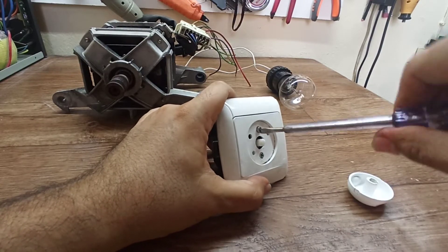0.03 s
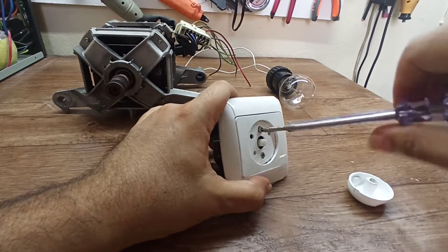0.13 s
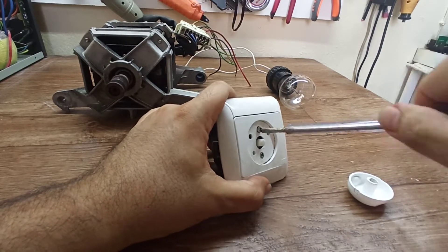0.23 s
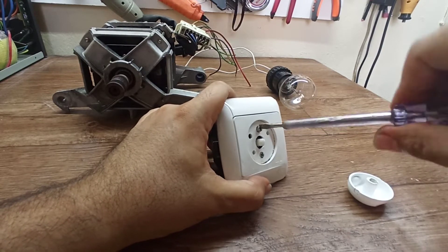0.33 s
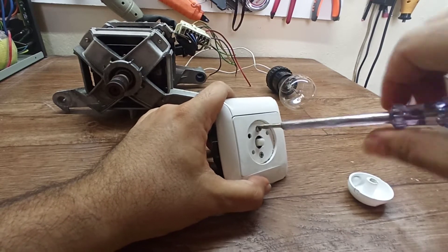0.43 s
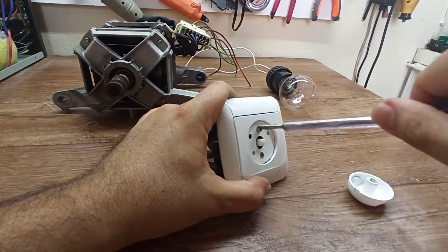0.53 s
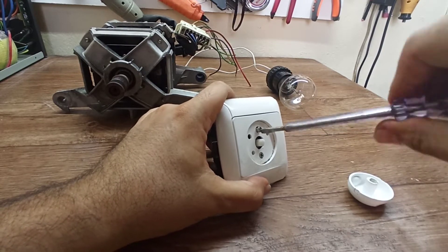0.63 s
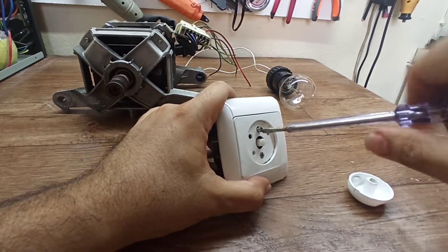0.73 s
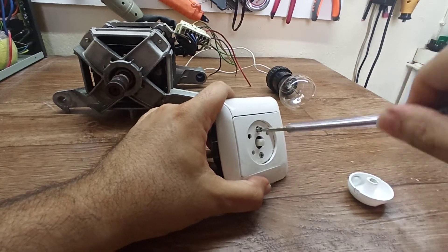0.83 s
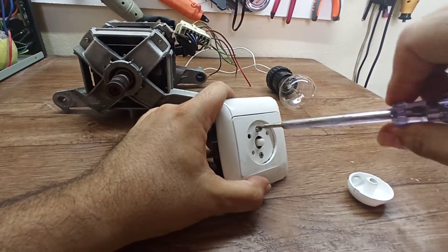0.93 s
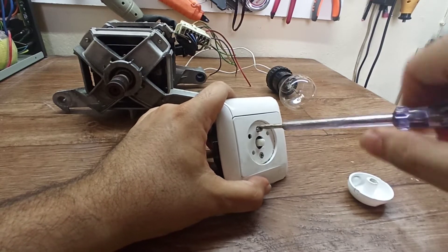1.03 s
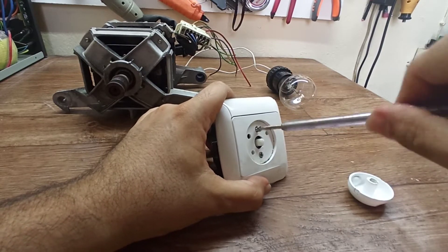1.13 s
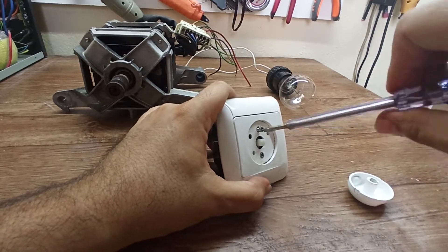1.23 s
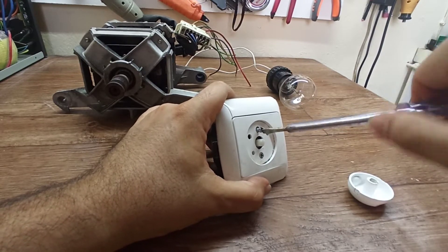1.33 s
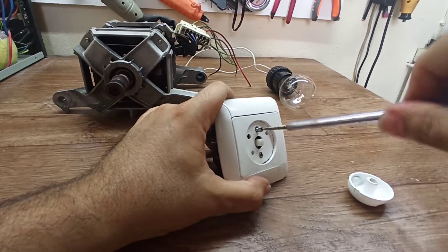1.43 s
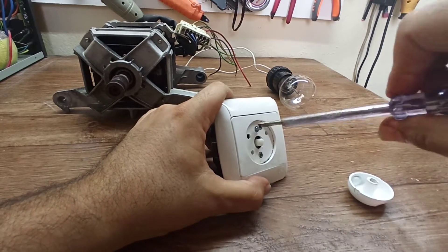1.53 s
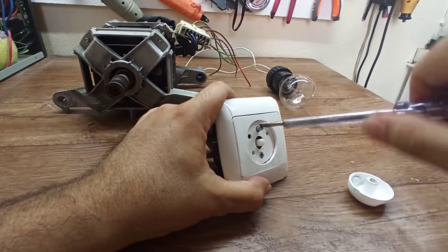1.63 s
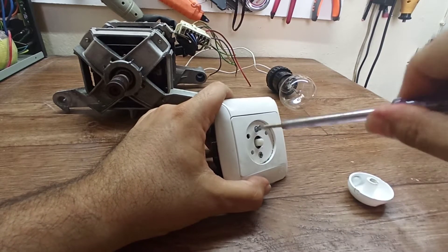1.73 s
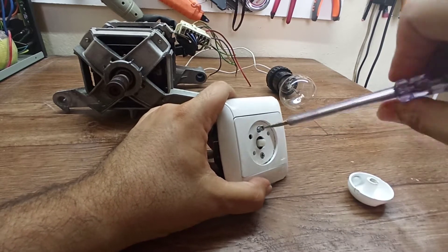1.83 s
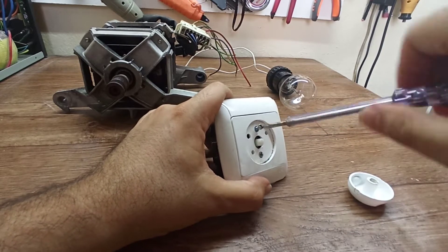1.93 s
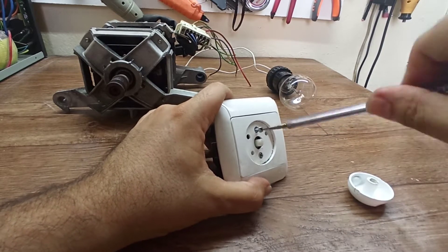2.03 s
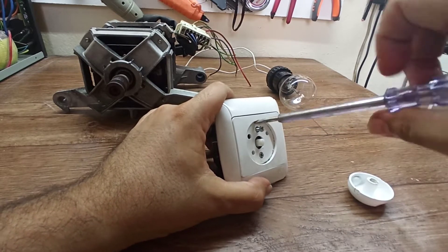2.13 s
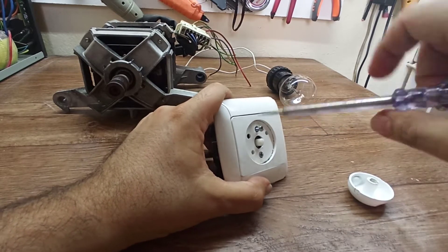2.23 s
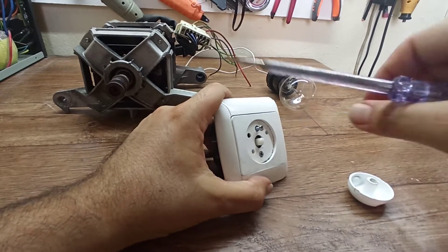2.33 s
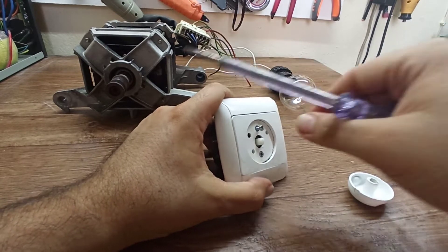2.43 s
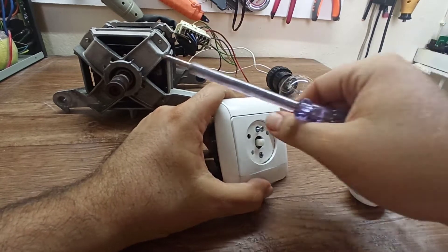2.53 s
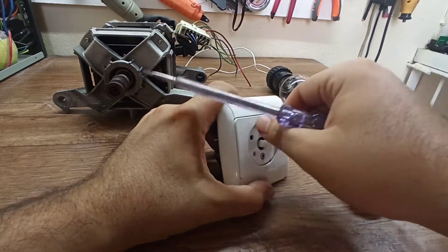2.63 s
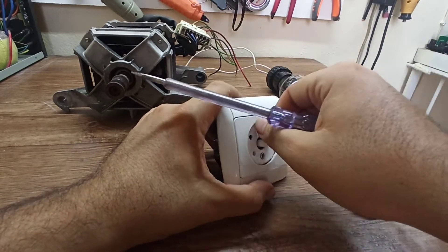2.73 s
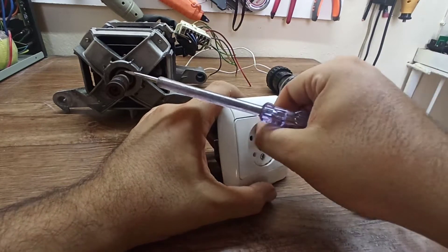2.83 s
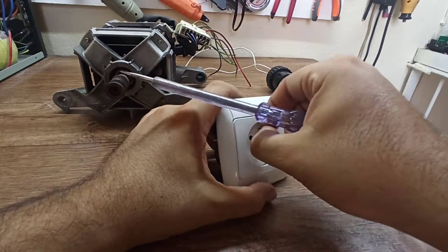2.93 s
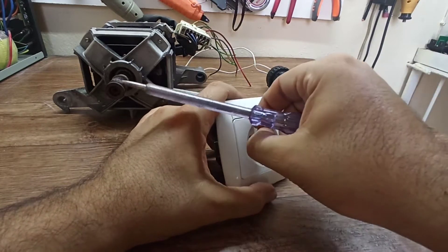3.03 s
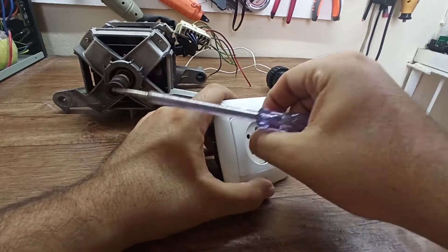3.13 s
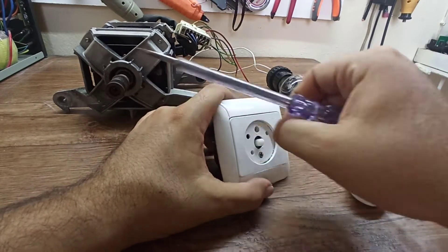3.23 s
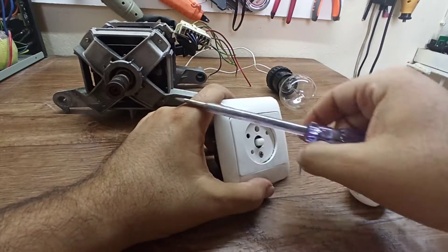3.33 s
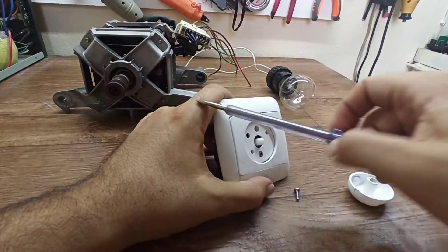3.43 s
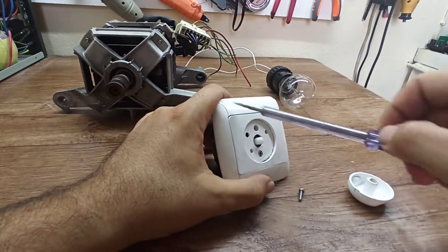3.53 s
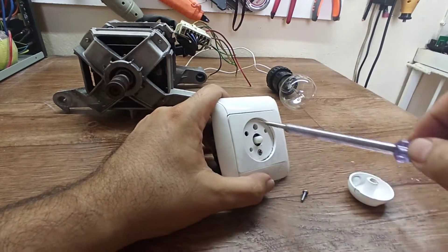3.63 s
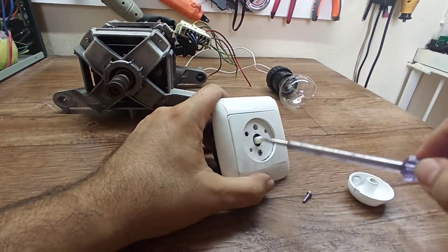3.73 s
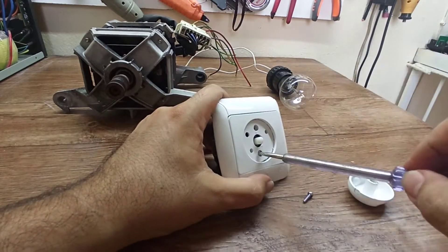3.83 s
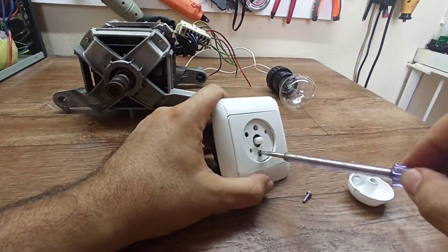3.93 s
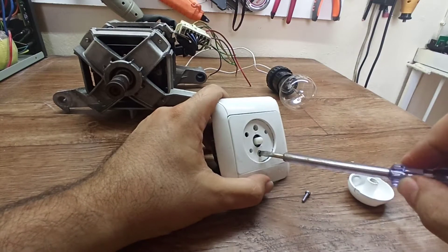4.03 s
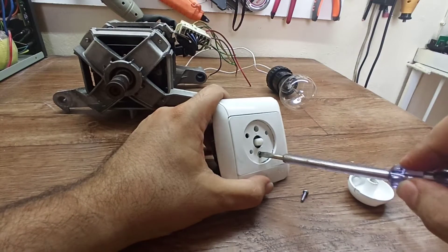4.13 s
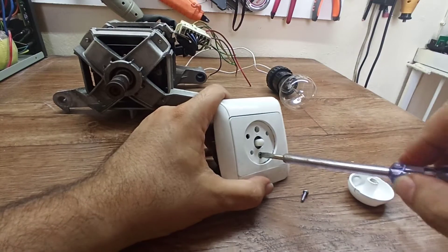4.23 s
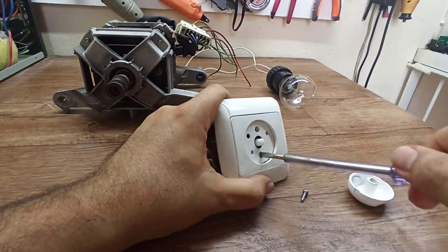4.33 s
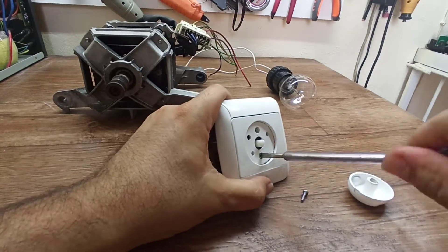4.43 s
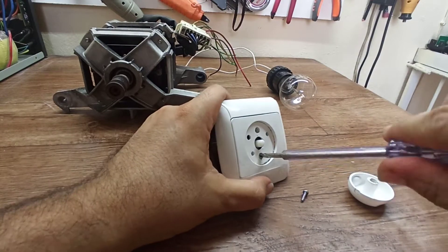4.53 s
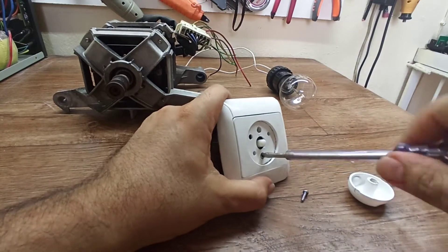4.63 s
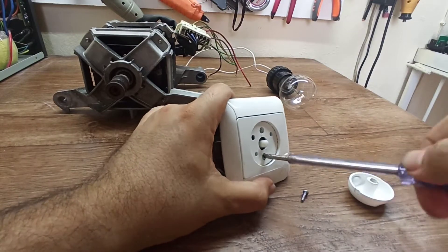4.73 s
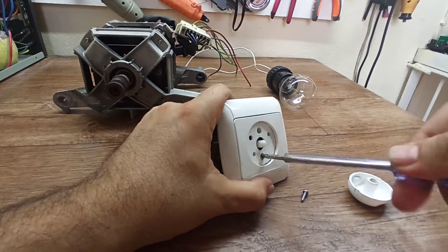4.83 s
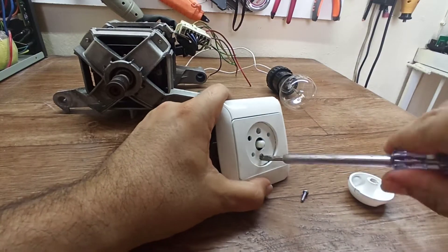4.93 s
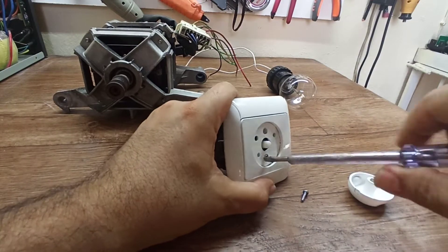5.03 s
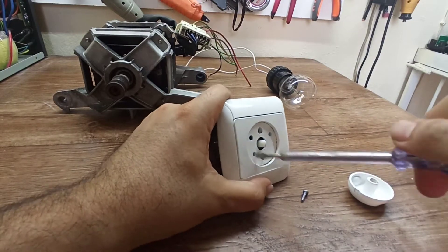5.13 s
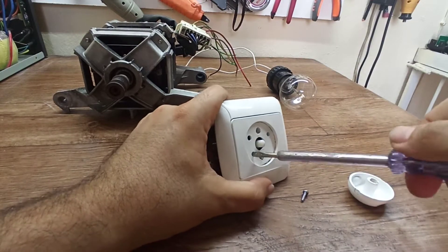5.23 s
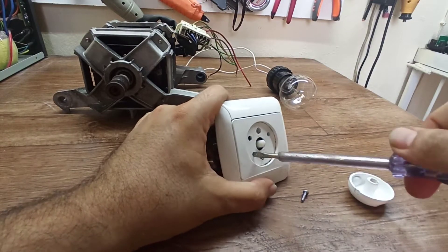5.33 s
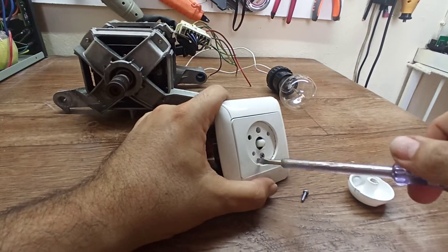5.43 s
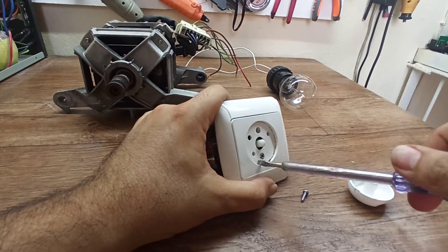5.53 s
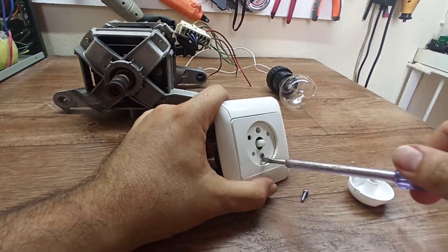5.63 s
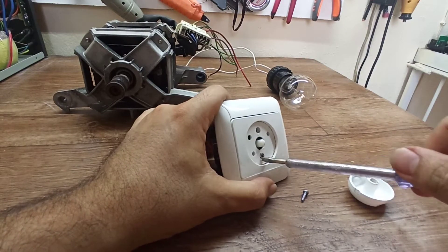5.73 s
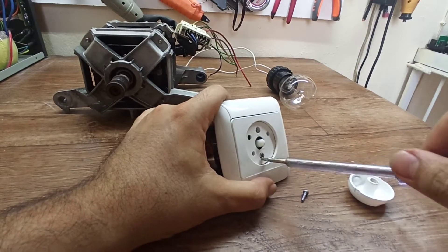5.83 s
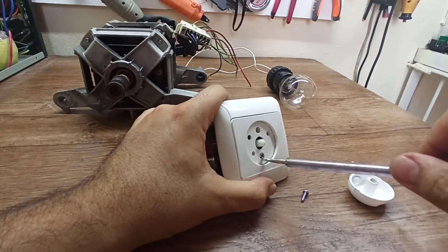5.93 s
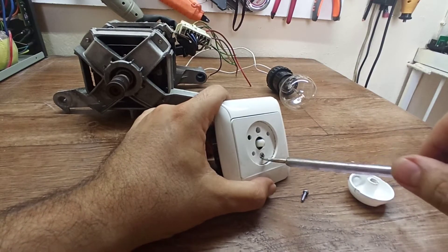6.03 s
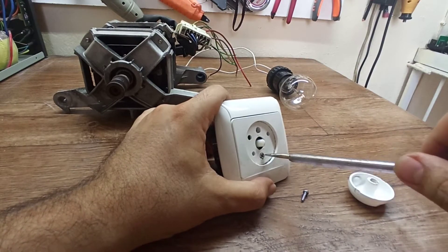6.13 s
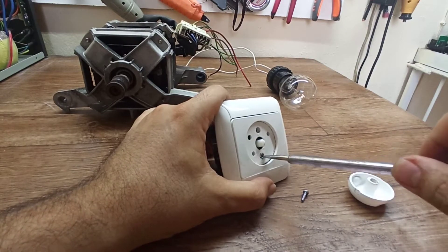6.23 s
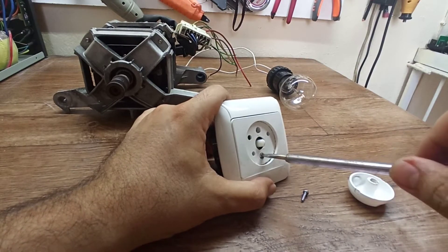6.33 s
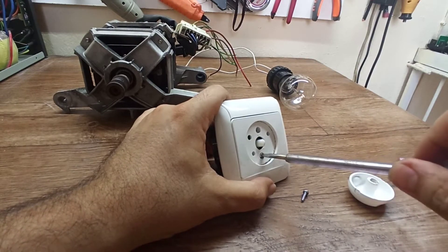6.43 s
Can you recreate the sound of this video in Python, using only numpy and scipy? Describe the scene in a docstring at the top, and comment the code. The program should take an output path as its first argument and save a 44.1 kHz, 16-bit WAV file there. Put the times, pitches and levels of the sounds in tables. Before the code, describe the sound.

In a small room, a screwdriver works on a plastic wall socket held on a wooden bench, close to the microphone. From 0 to 1.8 s there are barely audible ticks and rubs in the screw slot, with soft, dull hand thumps felt through the wood. At about 2.06 s the blade slips with a sharp, bright clack, a tiny scrape and a short hollow plastic rattle. Light clicks come near 2.95 s, then the strongest muffled bump at 3.1 s. At 3.38 s a small screw drops with a quick double knock and faint skips. A click at 3.56 s leads to low bumps at 3.6-3.8 s and small ticks around 4-4.6 s. Two crisp, hard clicks snap close together at 4.96-4.99 s with a brief scrape. Faint ticks and soft thumps continue until about 6.3 s over low rumble and thin steady hiss.

```python
"""A screwdriver works the screws of a plastic wall socket that one hand holds on a wooden workbench.
The blade ticks and slips (noise bursts plus a ringing housing) and scrapes (clouds of tiny slips).
Pushes of the hands reach the microphone through the bench as dull thumps: low-passed pulses and noise.
A loose screw drops on the bench as short decaying knocks. A small room answers blade and screw;
soft rumble and hiss lie underneath."""
import sys
import numpy as np
from scipy import signal
from scipy.fft import rfft, irfft, next_fast_len
from scipy.io import wavfile
from scipy.ndimage import map_coordinates

SR = 44100
rng = np.random.default_rng(int(sys.argv[2]) if len(sys.argv) > 2 else 0)


def master_out(mix):
    """Clip the mix to full scale and print it as 16-bit PCM to the path in sys.argv[1]."""
    frames = np.transpose(np.atleast_2d(mix))
    ceiling = np.clip(frames, -1, 1)
    pcm = np.round(ceiling * 32767).astype(np.int16)
    wavfile.write(sys.argv[1], SR, pcm)


N = 286209

# The blade slips on screw and housing:
# (time [s], relative level [dB], relative body [dB], relative sparkle [dB], strongest pitch [Hz])
BLADE_SLIPS = [(.184, -34, -2, -30, 8300), (.267, -41.5, -4, -12, 7600), (.5, -45, 3.5, -37, 1050),
               (.701, -39.5, -1, -33.5, 980), (.828, -39, -14, -24, 7500), (1.418, -39, -2, -18.5, 7700),
               (1.588, -46.5, -8, -11, 7500), (1.972, -32.5, -7, -30.5, 5200),
               (2.051, -35.5, 10, -18.5, 1710), (2.058, -15, -6.5, -20, 1380), (2.062, -8, -9, -16.5, 6400),
               (2.093, -17.5, -5, -27.5, 6600), (2.652, -40, -0.5, -36, 4400),
               (2.932, -30.5, -3, -28.5, 4200), (2.95, -20.5, -17.5, -20, 7900),
               (2.996, -30.5, -3, -22, 4500), (3.5596, -17.5, -3, -30, 3900), (3.5707, -30, -23, -32, 940),
               (3.673, -40.5, -5, -16, 7400), (3.85, -27.5, 1, -18, 7640), (4.037, -32, -0.5, -26, 1070),
               (4.39, -36, -12, -18.5, 3640), (4.598, -29, 0.5, -26, 1090), (4.933, -22, -8, -16.5, 3180),
               (4.9605, -10, -1, -19.5, 7100), (4.9875, -10, -7, -24, 1700),
               (5.145, -30.5, -5.5, -32, 2420), (5.263, -39, 0.5, -19.5, 4030),
               (5.405, -43, -1.5, -23.5, 2800), (5.5034, -28.5, -7.5, -50, 3040),
               (5.644, -36, -3.5, -33, 6000), (6.04, -28, -5, -16, 4250), (6.191, -38.5, 1, -42, 1700),
               (6.231, -34, 2, -23, 3850), (6.307, -39, 2.5, -30, 2380)]
# The screw lands and skips on the wood: (time [s], relative level [dB])
SCREW_LANDINGS = [(3.3816, -15.5), (3.388, -16.5), (3.4072, -33), (3.4156, -34)]
# The blade drags over metal and plastic: (middle [s], half length [s], level [dB])
BLADE_DRAGS = [(1.978, 0.0081, -49.5), (2.074, 0.019, -38.5), (2.67, 0.033, -55), (2.947, 0.023, -45),
               (4.595, 0.0072, -48.5), (4.969, 0.018, -40), (6.251, 0.011, -56)]
# Housing and blade ring together: (pitch [Hz], relative strength [dB], time to fall by 60 dB [s])
HOUSING_RINGS = [(723, 0.5, .08), (858, 4.5, 0.08), (1106, 10.5, 0.035), (1277, 8.5, 0.044),
                 (1540, 4, 0.028), (1784, -1, 0.033), (1910, -13, 0.062), (2180, -5.5, 0.13),
                 (2800, 7, 0.051), (3020, -2, .06), (3200, -2, 0.078), (3810, -16, 0.031),
                 (4200, -21.5, .04), (4610, 8, 0.059), (5480, 8, 0.074), (6810, 6.5, 0.043),
                 (6430, 3.5, 0.11), (6820, -2, 0.064), (7480, -2, 0.075), (8060, -21, .07)]
# Tone colour of the blade's contact: (frequency [Hz], gain [dB])
CONTACT_COLOUR = [(100, -21), (400, -11.5), (700, -6), (1000, -8), (1600, -6.5), (2400, -3), (4400, 0),
                  (5100, -11), (6600, -1.5), (8300, -3), (12000, 0.5), (16000, -7)]
# Tone colour of the room rumble: (frequency [Hz], relative density [dB per Hz])
RUMBLE_COLOUR = [(20, -31), (40, -20.5), (62, -13.5), (85, 6), (105, 7), (180, -9.5), (300, -1),
                 (420, -7.5), (570, -15.5), (760, -15.5), (890, -9), (1500, -22.5), (3000, -24.5),
                 (4500, -25), (5200, -36.5), (6500, -26.5), (8300, -35), (11000, -53)]
# Tone colour of the microphone hiss: (frequency [Hz], relative density [dB per Hz])
HISS_COLOUR = [(4000, -44.5), (7000, -12), (8300, 1), (12000, -0.5), (15500, -6.5)]
# How long the room rings on: (frequency [Hz], time to fall by 60 dB [s])
ROOM_DECAY = [(100, 0.26), (400, 0.39), (1200, 0.34), (3000, 0.66), (7000, 0.58), (9000, 0.47),
              (15000, 0.42)]
# How the microphone colours the sound: (frequency [Hz], gain [dB])
MICROPHONE_COLOUR = [(20, 2.5), (8450, -1.5), (8850, -15), (10200, -19), (11300, -20.5), (11700, -2.5),
                     (16000, 5)]
# While the screw turns, the blade ticks and rubs faintly in its slot: (start [s], end [s])
TURNING_SPELLS = [(0, 1.8), (4.75, 4.93)]
# The hands push the housing against the bench:
# (main jolt [s], relative level [dB], build-up [s], run-out [s], approximate upper edge [Hz])
HAND_PUSHES = [(.355, -30, 0.033, 0.026, 250), (.621, -27.5, 0.036, 0.053, 312), (.858, -34, 0, 0, 235),
               (1.039, -38, 0, 0, 178), (1.102, -33.5, 0, 0, 322), (1.324, -36, 0, 0, 216),
               (1.46, -31.5, 0, 0.069, 280), (1.614, -35.5, 0.042, 0.087, 233),
               (1.808, -29.5, 0, 0.043, 210), (1.886, -28.5, 0, 0.048, 256), (2.07, -33.5, 0, 0.036, 318),
               (2.245, -37, 0, 0.001, 242), (2.443, -40.5, 0.043, 0, 210), (2.912, -35, 0.0065, 0.042, 243),
               (3.084, -21, 0.064, 0.042, 345), (3.351, -37.5, 0, 0, 182), (3.533, -34, 0.028, 0, 333),
               (3.636, -25, .02, 0.0024, 288), (3.757, -23.5, 0, 0.023, 294),
               (3.971, -37.5, 0, 0.0002, 163), (4.127, -28, .029, .028, 387),
               (4.389, -24.5, .017, 0, 257.3), (4.425, -29, 0.0044, 0.056, 330),
               (4.866, -32.5, 0.054, .032, 270), (4.936, -28.5, 0, .064, 381),
               (5.138, -29, .018, 0.0013, 421.6), (5.159, -29.5, 0, 0.086, 274), (5.342, -34, 0, 0, 228),
               (5.424, -27.5, 0, .027, 300), (5.619, -32.5, 0, 0.022, 252.4),
               (5.816, -37, 0.0025, 0.014, 194), (5.998, -29, 0, 0.028, 336),
               (6.221, -34.5, 0.00065, 0.031, 270.4), (6.302, -34.5, 0.03, 0, 320)]

TOP_HZ = 15900  # nothing passes the microphone from here up
RIPPLE_HZ = 210  # spacing of the ripples that close reflections cut into a spectrum
# Faint ticks while the screw turns
TICKS_PER_S, TICK_DB, TICK_SPREAD_DB = 5.5, -48, 3
TICK_BODY_DB, TICK_SPARKLE_DB, TICK_PITCH_HZ = -1.5, -24.5, (1000, 7500)
RUB_HALF_S, RUB_UNDER_DB = .018, 18  # the rub that goes with each faint tick
ROCK_S, ROCK_JITTER_S = .029, 0.00299  # the housing rocks from jolt to jolt within a push
ROCK_FADE_DB, DULL_OCTAVES_PER_DB = 4.5, 0.14  # the outermost jolts are weaker, and weaker is duller
NUDGES_PER_S, NUDGE_DB, NUDGE_EDGE_HZ = 16, -53.5, 185


def amp(db):
    """Turn decibels into a plain factor."""
    return 10 ** (np.asarray(db) / 20)


def unit(x):
    """Scale a sound to an average (rms) strength of 1."""
    return x / np.sqrt(np.mean(x ** 2) + 1e-20)


def along(points, hz):
    """Read a curve of (frequency [Hz], value) points on a log frequency axis."""
    f, v = np.transpose(points)
    return np.interp(np.log(hz + 1), np.log(f + 1), v)


def add(track, s, sound):
    """Mix a sound into a track from time s on, cutting off what lies outside."""
    start = round(s * SR)
    part = sound[max(-start, 0):max(len(track) - start, 0)]
    track[max(start, 0):][:len(part)] += part


def coloured(x, gain):
    """Filter x to this gain over frequency, with no sound before its cause."""
    size = 2 * next_fast_len(len(x) // 2 + 2048)
    hz = np.fft.rfftfreq(size, 1 / SR)
    # folding the cepstrum (the spectrum of the log gain) forward makes the filter minimum-phase
    cepstrum = irfft(np.log(np.maximum(gain(hz), 1e-6)))
    cepstrum[1:size // 2] *= 2
    cepstrum[size // 2 + 1:] = 0
    response = np.exp(rfft(cepstrum))
    return irfft(rfft(x, size) * response)[:len(x)]


def noise(spectrum):
    """Steady random noise with this tone colour and an rms of 1."""
    return unit(coloured(rng.standard_normal(N), lambda hz: amp(along(spectrum, hz))))


def below(hz, edge_hz, order):
    """Gain of a low-pass: higher orders cut more steeply above the edge."""
    return 1 / np.sqrt(1 + (hz / edge_hz) ** (2 * order))


def wobble(position):
    """A smooth random curve with one knot per unit of position."""
    knots = rng.standard_normal(int(position.max()) + 4)
    return map_coordinates(knots, [position])


def room_tail(build):
    """A fresh room answer of energy 1: noise that builds up and dies band by band."""
    hz, t, z = signal.stft(rng.standard_normal(SR // 2), SR, nperseg=256)
    decay = amp(-60 * t / along(ROOM_DECAY, hz)[:, None])
    rise = 1 - np.exp(-t / build)
    tail = signal.istft(z * decay * rise, SR, nperseg=256)[1]
    return tail / np.linalg.norm(tail)


def in_room(x, wet_db, ripple_db):
    """The direct sound, rippled by reflections off bench and hands, plus smooth reverberation."""
    sound = amp(wet_db) * signal.fftconvolve(x, room_tail(build=0.0012))
    direct = coloured(x, lambda hz: amp(ripple_db * wobble(hz / RIPPLE_HZ)))
    sound[:len(x)] += direct * np.std(x) / np.std(direct)  # the ripple keeps the strength
    return sound


def bench(hz, edge_hz):
    """Gain of the bench, which passes only a low band of a push."""
    return below(hz, edge_hz, order=4) * (hz / 76) ** 5 * below(hz, 80.0, order=5)


def background():
    """Room rumble, a noise that swells a little, and steady microphone hiss."""
    swell = wobble(np.arange(N) / SR * 9)  # nine knots per second
    rumble = amp(-54.0 + 0.84 * swell) * noise(RUMBLE_COLOUR)
    hiss = amp(-74.5) * noise(HISS_COLOUR)
    return rumble + hiss


def fidgets():
    """The holding hand nudges the bench very lightly: random pulses that the bench dulls."""
    nudges = (rng.random(N) < NUDGES_PER_S / SR) * rng.uniform(-0.86, 1, N)
    return amp(NUDGE_DB) * unit(coloured(nudges, lambda hz: bench(hz, edge_hz=NUDGE_EDGE_HZ)))


def faint_ticks():
    """Light slips spread unevenly over each spell of turning, as rows like BLADE_SLIPS."""
    rows = []
    low_hz, high_hz = TICK_PITCH_HZ
    for start, end in TURNING_SPELLS:
        count = max(round((end - start) * TICKS_PER_S), 1)
        for k, (when, size, where) in enumerate(rng.random((count, 3))):
            s = start + (end - start) * (k + when) / count
            db = TICK_DB + TICK_SPREAD_DB * (2 * size - 1)
            pitch_hz = low_hz * (high_hz / low_hz) ** where
            rows.append((s, db, TICK_BODY_DB, TICK_SPARKLE_DB, pitch_hz))
    return rows


def blade_clicks(clicks):
    """Each slip is a crack, a brief chatter of the parts and the ring of the housing."""
    out, t = np.zeros(N), np.arange(SR // 6) / SR
    mode_hz, mode_db, t60 = np.transpose(HOUSING_RINGS)[:, :, None]
    attack = t < .008
    for s, db, body_db, top_db, pitch_hz in clicks:
        uneven_db = 2 * rng.standard_normal(mode_db.shape)  # no two slips ring alike
        strength = amp(mode_db + uneven_db - 60 * t / t60)
        # the rattling contact blurs the ringing pitches, the high ones most
        drift = np.cumsum(rng.standard_normal(strength.shape), 1)
        blur = drift * .0075 * np.sqrt(mode_hz / 1000)
        cycles = mode_hz * t + blur + rng.random(mode_hz.shape)
        ring = np.sum(strength * np.sin(2 * np.pi * cycles), 0)
        crack = amp(-60 * t / 0.018)
        chatter = amp(-8.5) * amp(-60 * t / 0.12)
        burst = (crack + chatter) * rng.standard_normal(len(t))
        # where the blade lands decides how much body and sparkle sound, and which pitch stands out
        balance = [(1900, body_db + 10), (3000, 0.0097), (8500, 0), (11500, top_db + 11.5)]

        def colour(hz):
            """Gain of this slip's contact, balance and strongest pitch."""
            accent_db = 7.25 * np.exp(-(np.log((hz + 1) / pitch_hz) / 0.22) ** 2)
            return amp(along(CONTACT_COLOUR, hz) + along(balance, hz) + accent_db)

        click = coloured(burst + amp(-20.5) * ring, colour)
        # the bright part of the attack sets the level
        snap = coloured(click, lambda hz: 1 - below(hz, edge_hz=2360, order=4))
        click = amp(db - 13) * click / np.std(snap[attack])
        add(out, s, in_room(click, wet_db=-12.0 + .08 * (db + 12.0), ripple_db=3.0))
    return out


def blade_scrapes(drags):
    """A drag is a cloud of tiny slips, brighter than a click, that swells and fades."""
    out, t = np.zeros(N), np.arange(-SR // 10, SR // 10) / SR
    tilt = [(1000, -6.0), (4000, -3.5), (7500, 2.5), (13000, -17)]  # (frequency [Hz], gain [dB])
    for s, half, db in drags:
        slips = rng.standard_normal(len(t)) * (rng.random(len(t)) < 2500 / SR)  # about 2500 a second
        grit = unit(coloured(slips, lambda hz: amp(along(CONTACT_COLOUR, hz) + along(tilt, hz))))
        drag = amp(db) * grit * np.exp(-(t / half) ** 2)
        add(out, s + t[0], in_room(drag, wet_db=-9.5, ripple_db=5.0))
    return out


def jolts():
    """Each push rocks up to its main jolt and down again: (time [s], level [dB], upper edge [Hz])."""
    rows = []
    for s, db, build_up, run_out, edge_hz in HAND_PUSHES:
        rows.append((s, db, edge_hz))
        for reach in (-build_up, run_out):
            count = round(abs(reach) / ROCK_S)
            for k in range(1, count + 1):
                loss_db = ROCK_FADE_DB * k / count
                when = s + reach * k / count + ROCK_JITTER_S * rng.standard_normal()
                duller_hz = edge_hz / 2 ** (DULL_OCTAVES_PER_DB * loss_db)
                rows.append((when, db - loss_db, duller_hz))
    return rows


def bench_thumps():
    """A jolt is one soft pulse amid a low judder; hard jolts are the cleanest."""
    out, t = np.zeros(N), np.arange(-SR // 10, SR // 4) / SR
    core = np.abs(t - .003) < .007  # the stretch that sets the level

    def felt(force, edge_hz):
        """A force heard through the bench, with energy 1."""
        sound = coloured(force, lambda hz: bench(hz, edge_hz))
        return sound / np.linalg.norm(sound)

    for s, db, edge_hz in jolts():
        pulse = felt(1. * (t == 0), edge_hz * 1.003) * rng.choice([-1, 1])
        swell = np.exp(-(t / np.where(t < 0, .011, .017)) ** 2)  # rises faster than it fades
        judder = felt(rng.standard_normal(len(t)) * swell, edge_hz * 1.046)
        # the bench top settles
        settling = rng.standard_normal(len(t)) * (t > 0) * amp(-60 * t / 0.29)
        tremble = felt(settling, edge_hz=151)
        thump = pulse + amp(-1.5 - 0.22 * (db + 33.0)) * judder + amp(-8.0) * tremble
        add(out, s + t[0] - .003, amp(db - 1.0) * thump / np.std(thump[core]))
    return out


def falling_screw():
    """Steel on wood: each landing is a very short 1500 Hz knock with a little fading noise."""
    out, t = np.zeros(N), np.arange(SR // 20) / SR
    for s, db in SCREW_LANDINGS:
        knock = -np.sin(2 * np.pi * 1500 * t) * amp(-60 * t / 0.0036)
        rattle = amp(-15.5) * amp(-60 * t / 0.053) * rng.standard_normal(len(t))
        tick = coloured(knock + rattle, lambda hz: below(hz, edge_hz=6050, order=4)
                        * (1 - below(hz, edge_hz=150, order=1)))
        add(out, s, in_room(amp(db + 1.5) * tick, wet_db=-14, ripple_db=2.5))
    return out


def scene():
    """All sources add up at the one microphone."""
    ticks = faint_ticks()
    rubs = [(s, RUB_HALF_S, db - RUB_UNDER_DB) for s, db, *_ in ticks]
    blade = blade_clicks(list(BLADE_SLIPS) + ticks) + blade_scrapes(list(BLADE_DRAGS) + rubs)
    return (background() + fidgets() + blade + bench_thumps() + falling_screw())[None]


def record(dry):
    """The microphone has a deep dip near 10 kHz and a steep band limit."""
    sound = coloured(dry[0], lambda hz: amp(along(MICROPHONE_COLOUR, hz)))
    size = next_fast_len(N + SR // 2)
    passed = np.fft.rfftfreq(size, 1 / SR) < TOP_HZ
    return irfft(rfft(sound, size) * passed, size)[None, :N]


dry = scene()
out = record(dry)
master_out(out)
```